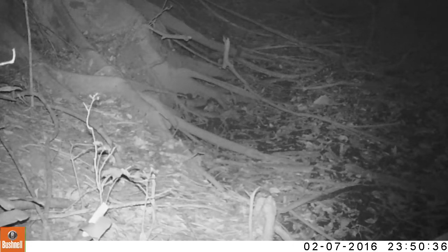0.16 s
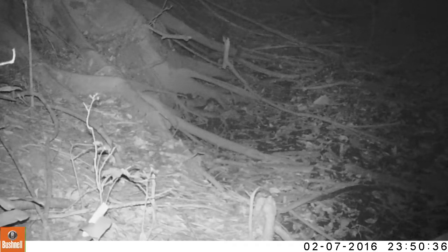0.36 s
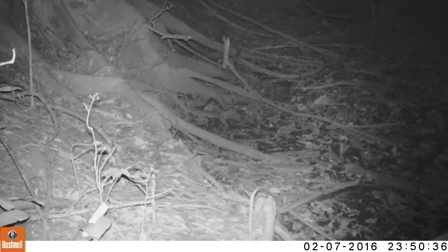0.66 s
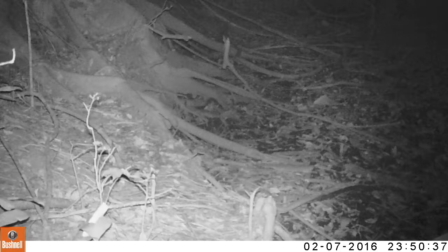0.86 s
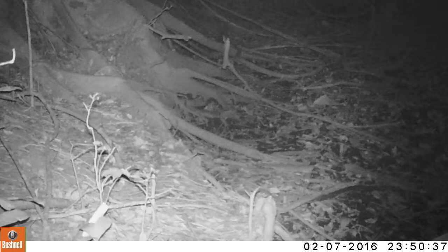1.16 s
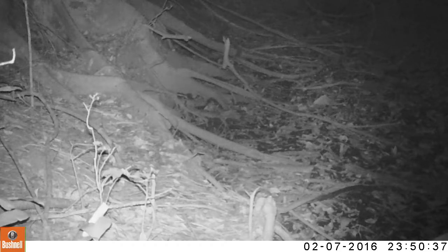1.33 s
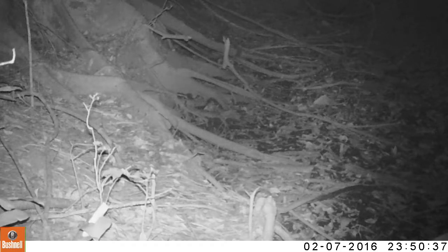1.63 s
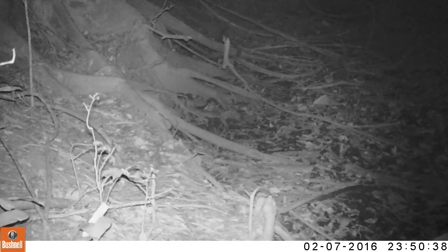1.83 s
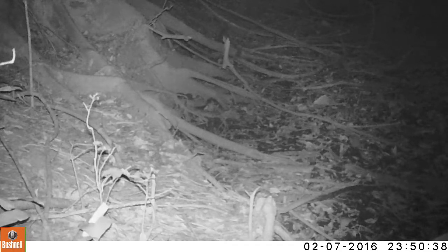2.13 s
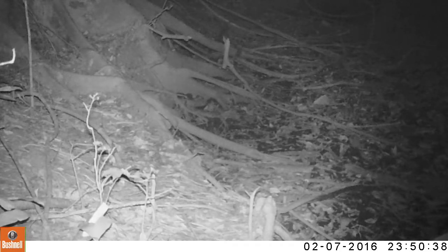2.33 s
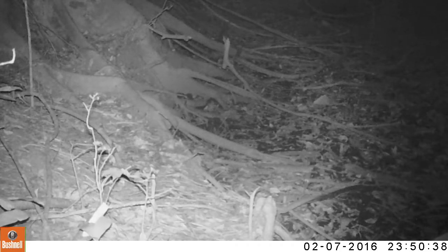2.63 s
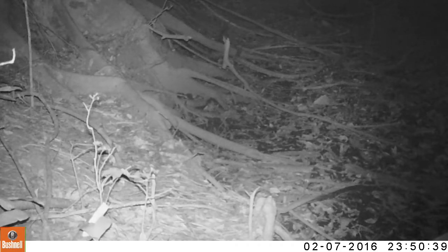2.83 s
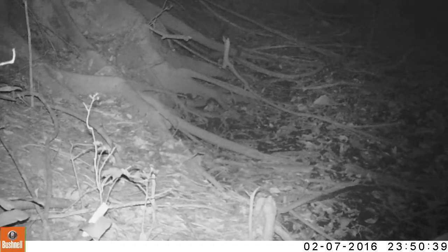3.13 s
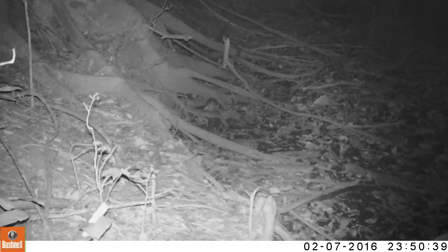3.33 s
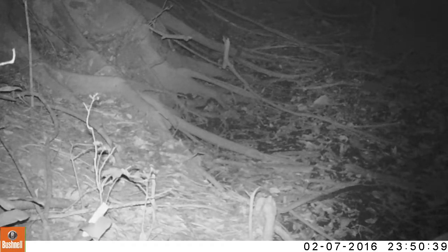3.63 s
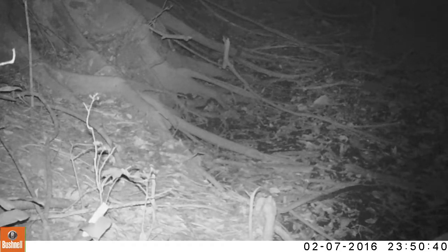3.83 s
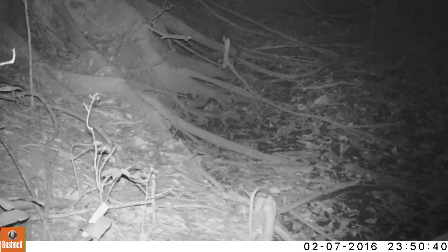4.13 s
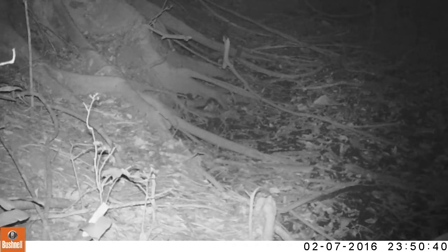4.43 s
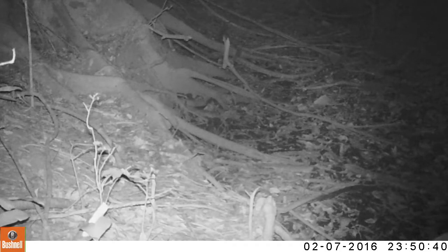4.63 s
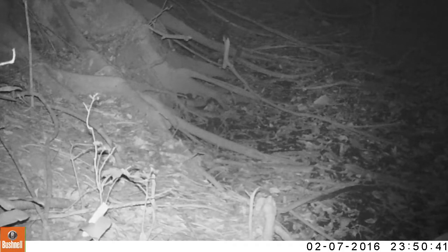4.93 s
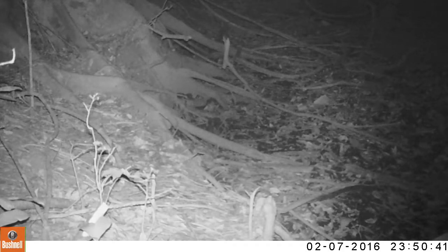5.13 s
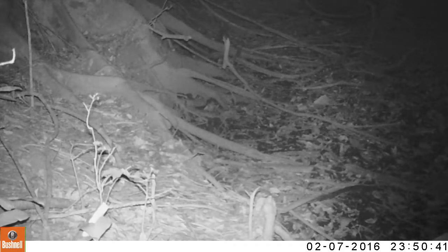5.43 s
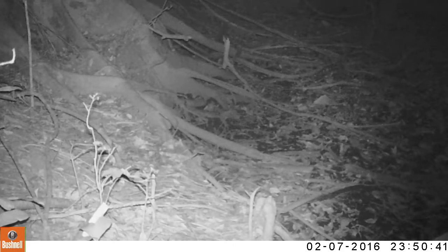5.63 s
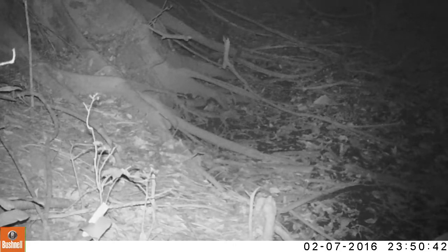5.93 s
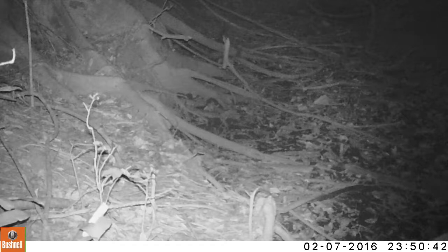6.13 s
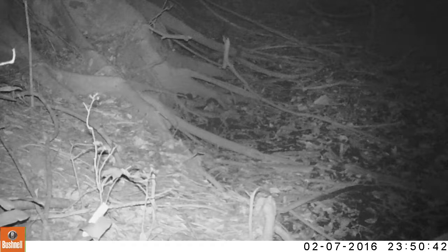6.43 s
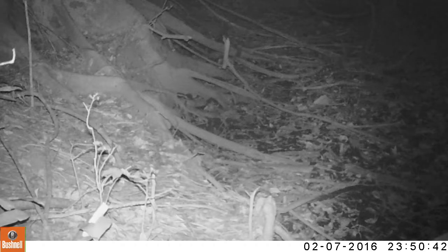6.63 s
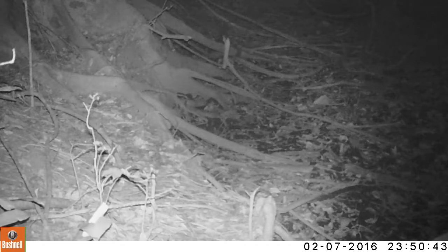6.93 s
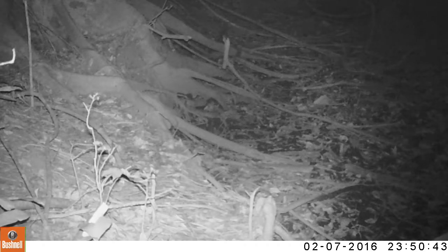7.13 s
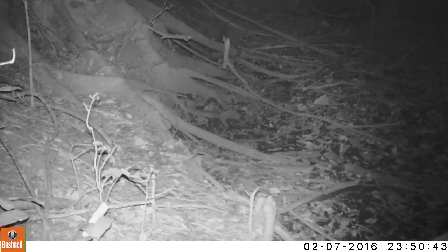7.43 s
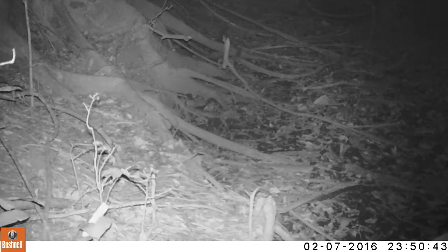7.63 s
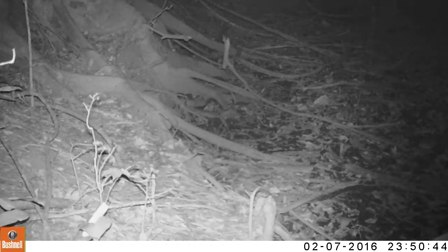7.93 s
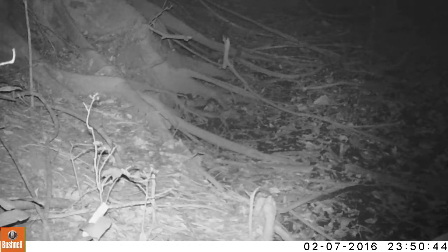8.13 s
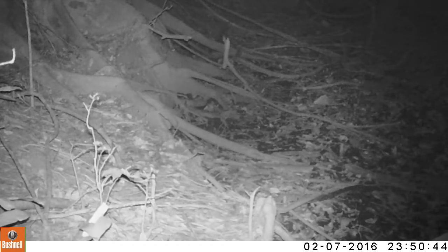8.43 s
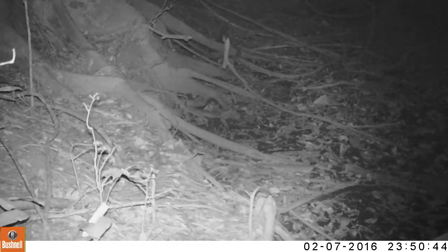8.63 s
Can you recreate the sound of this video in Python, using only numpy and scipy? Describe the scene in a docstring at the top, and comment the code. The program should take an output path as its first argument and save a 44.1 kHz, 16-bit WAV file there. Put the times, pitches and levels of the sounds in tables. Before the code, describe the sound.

Night insects fill a dark forest floor: a low, pulsing tree-cricket trill, chirping crickets and a shrill high buzzing chorus over faint hiss.

```python
"""A forest floor at night, heard by a small microphone among the roots.
A tree cricket trills at 2 kHz, crickets chirp near 5 kHz, and fast buzzers shrill at 4 and 6 kHz.
Each distinct song is a train of gliding wing strokes with echoes; a haze round the trill
and the merged far chorus are shaped noise. Dry litter stirs faintly as bursts of crackling noise,
over a low rumble and hiss, also shaped noise."""
import sys
import numpy as np
from scipy import signal
from scipy.fft import rfft, irfft, next_fast_len
from scipy.io import wavfile

SR = 44100
rng = np.random.default_rng(int(sys.argv[2]) if len(sys.argv) > 2 else 0)


def to_wav(s):
    """Save 16-bit WAV."""
    ch = np.atleast_2d(s).T  # columns
    pcm = np.round(np.clip(ch, -1, 1) * 32767)  # PCM
    wavfile.write(sys.argv[1], SR, pcm.astype(np.int16))


N = 386316
TIME = np.arange(N) / SR  # s

# In stroke and colour tables only level differences count: the sound is scaled afterwards.
# One wing stroke of the tree cricket, a swelling upward glide:
# (share of the cycle [0-1], pitch before flutter [Hz], relative level [dB])
TRILL_STROKE = [(0, 1860, -80), (.14, 1860, -28), (.21, 1895, -6), (.3, 1965, -.7), (.58, 2138, 1),
                (.67, 2135, 0), (.73, 2105, -18), (1, 2100, -80)]
# The band in which its wings ring: (lowest [Hz], highest [Hz])
TRILL_WING_BAND = (1810, 2205)
# Diffuse haze at the trill's pitch: (frequency [Hz], relative level in each Hz [dB])
TRILL_HAZE_COLOUR = [(1700, -40), (1870, -12), (1960, 0), (2130, 0), (2190, -12), (2260, -40)]
TRILL_STROKES_PER_S = 14.815
TRILL_DB, TRILL_HAZE_DB = -59.5, -66.5

# One stroke of a shrill buzzer, falling as the wing slows:
# (share of the cycle [0-1], pitch before detuning [Hz], relative level [dB])
SHRILL_STROKE = [(0, 6330, -11), (.22, 6320, -15), (.33, 6238, 2.5), (.44, 6133, -1.5), (.56, 5996, -5.5),
                 (.68, 5870, 2.5), (.8, 5520, -30), (1, 5550, -38)]
SHRILL_STROKES_PER_S = 53.22
# The nearest shrill buzzer holds its level, then fades away quickly.
NEAR_SHRILL_DB, NEAR_SHRILL_STOP_S, NEAR_SHRILL_FADE_DB_PER_S = -59, 2.5, 112

# Farther shrill buzzers: (pitch ratio [-], stroke rate [1/s], level against the merged chorus [dB])
SHRILL_NEIGHBOURS = [(.975, 59, -10.5), (.95, 42, -12.5), (1.005, 66, -16.5)]
# The merged far chorus: (frequency [Hz], relative level in each Hz [dB])
CHORUS_COLOUR = [(3700, -39), (4100, -30.5), (4480, -12), (4660, -20.5), (4900, -5), (5200, -20.5),
                 (5400, -13.5), (5700, -1.5), (5950, 0.5), (6250, 0), (6450, -8), (6700, -20),
                 (7000, -20.5), (7500, -63)]
# The level at the start, and how fast it climbs.
CHORUS_START_DB, CHORUS_SWELL_DB_PER_S = -61, .38

# One stroke of a low buzzer, falling evenly:
# (share of the cycle [0-1], pitch before detuning [Hz], relative level [dB])
BUZZ_STROKE = [(0, 4395, -22), (.08, 4375, 0), (.38, 4225, 0), (.88, 3895, -5), (1, 3860, -22)]
# The low buzzers: (pitch ratio [-], stroke rate [1/s], level against BUZZ_DB [dB])
LOW_BUZZERS = [(1, 70.08, 0), (.997, 69.15, 0), (1, 56.5, -3)]
# The band in which their wings ring: (lowest [Hz], highest [Hz])
BUZZ_WING_BAND = (3800, 4430)
BUZZ_DB = -70

# One stroke within a chirp: (share of the cycle [0-1], pitch ratio [-], relative level [dB])
CHIRP_STROKE = [(0, 1.005, -12), (.15, 1.004, 0), (.7, .998, 0), (1, .993, -12)]
# Every chirp has the same length and swells and fades alike.
CHIRP_S, CHIRP_RISE_S, CHIRP_FALL_S = 0.474, 0.055, .1
# Far crickets with a steady pace:
# (pitch [Hz], stroke rate [1/s], first chirp [s], time between chirp starts [s], level [dB])
FAR_CRICKETS = [(5050, 24.1, .15, .84, -73.5), (4965, 22.8, .1, .915, -72.5), (4850, 21.3, .4, .98, -75),
                (5229, 26.2, 3.6, 1.1, -80)]
# When the chirps of the two nearer crickets start: (time [s])
HIGH_CHIRP_STARTS = [.22, 1.24, 2.23, 3.08]
LOW_CHIRP_STARTS = [.7, 1.4, 2.33, 3.33, 4.32, 5.2, 5.93, 6.68, 7.78, 8.52]
NEAR_CHIRP_STROKES_PER_S = 22.5
HIGH_CRICKET_HZ, LOW_CRICKET_HZ = 4949, 4878
HIGH_CRICKET_DB, LOW_CRICKET_DB = -62, -68.5

# Dry litter stirring: (start [s], time to fall to 37 % [s], level [dB])
RUSTLES = [(1.05, 0.046, -73), (6.87, 0.056, -68), (6.935, .09, -71), (7.07, 0.34, -77), (8.15, .15, -76)]
# The colour of the litter: (frequency [Hz], relative level in each Hz [dB])
LITTER_COLOUR = [(1500, -42), (3500, 2), (6500, -2), (8000, 3.5), (9500, -9), (11000, -20), (14000, -30)]
RUSTLE_RISE_S = 0.011

# Low rumble and hiss: (frequency [Hz], relative level in each Hz [dB])
FLOOR_COLOUR = [(12, -64), (28, -70), (60, -75), (120, -81), (250, -87.5), (500, -95), (1000, -103.5),
                (1700, -108), (2600, -110.5), (3600, -111.5), (7800, -117), (10000, -118.7),
                (13500, -119.8)]
FLOOR_DB = -52

FOREST_TAIL_S = 0.71  # time for the long echo tail to fall by 60 dB
CUTOFF_HZ = 13900


def from_db(db):
    """Turn decibels into a gain."""
    return 10 ** (np.asarray(db) / 20)


def rms_one(x):
    """Scale a signal to an average power of one."""
    return x / np.sqrt(np.mean(x ** 2) + 1e-20)


def read(rows, at):
    """Read a table's columns at any point, joining its rows by straight lines."""
    first, *columns = np.transpose(rows)
    return [np.interp(at, first, column) for column in columns]


def drift(corner_hz):
    """Smooth random motion of spread 1: noise whose changes faster than the corner are weakened."""
    hz = np.arange(N // 2 + 1) * SR / N
    smoothed = rfft(rng.standard_normal(N)) / (1 + (hz / corner_hz) ** 2)
    return rms_one(irfft(smoothed, N))


def wander(points_per_s):
    """Straight lines between random values of spread 1."""
    return np.interp(TIME * points_per_s, np.arange(1000), rng.standard_normal(1000))


def coloured(x, colour):
    """Strengthen and weaken frequencies as a colour table says, then scale to power one."""
    size = next_fast_len(N, True)
    hz, db = np.transpose(colour)
    bins_hz = np.maximum(np.arange(size // 2 + 1) * SR / size, 1)
    gain = from_db(np.interp(np.log(bins_hz), np.log(hz), db))
    gain = gain * (bins_hz > hz[0])  # nothing below the first row
    return rms_one(irfft(rfft(x, size) * gain, size)[:N])


def strokes(shape, cycles, pitch, uneven_db, detune, scatter):
    """A scraper runs over a file once a cycle and the wing sings a glide, never quite the same twice."""
    which = np.maximum(cycles, 0).astype(int)
    hz, db = read(shape, cycles % 1)
    # Each stroke has its own force, tuning and starting point in the wave.
    force, tuning, start = rng.standard_normal((1200, 3))[which].T
    turns = np.cumsum(hz * pitch * (1 + detune * tuning)) / SR
    turns = turns - np.interp(which, cycles, turns)  # the wing starts afresh at every stroke
    tone = np.sin(2 * np.pi * (turns + scatter * start))
    return rms_one(from_db(db + uneven_db * force) * tone)


def wing(x, band_hz):
    """A wing sends out sound mostly within the band where it rings."""
    band_pass = signal.butter(4, band_hz, "band", fs=SR, output="sos")
    return rms_one(signal.sosfilt(band_pass, x))


def chirps(starts, pitch_hz, strokes_per_s, slip_rad=1.1, uneven_db=2):
    """One cricket: chirps of about ten strokes that swell and fade, uneven in force and tune."""
    swell = 0
    for start_s in starts:
        rise = np.clip((TIME - start_s) / CHIRP_RISE_S, 0, 1)
        fall = np.clip((start_s + CHIRP_S - TIME) / CHIRP_FALL_S, 0, 1)
        swell = swell + rise * fall
    ratio, db = read(CHIRP_STROKE, strokes_per_s * TIME % 1)
    phase = 2 * np.pi * np.cumsum(pitch_hz * ratio) / SR
    phase = phase + slip_rad * wander(2 * strokes_per_s)
    loudness = from_db(db + uneven_db * wander(strokes_per_s))
    return swell * rms_one(loudness * np.sin(phase))


def forest(x, near_db, far_db, near_t60=0.36):
    """Direct sound, a quick scatter from ground and trunks, and a longer tail; the power is kept."""
    t = TIME[:SR // 2]
    early, late = rng.standard_normal((2, len(t))) * (t > .002)  # no echo in the first 2 ms
    early = early * from_db(-60 * t / near_t60)
    late = late * from_db(-60 * t / FOREST_TAIL_S)
    echoes = from_db(near_db) * rms_one(early) + from_db(far_db) * rms_one(late)
    echoes = echoes / np.sqrt(len(t))  # the levels now compare with the direct sound
    return np.std(x) * rms_one(x + signal.fftconvolve(x, echoes)[:N])


def tree_cricket():
    """A steady trill of slow strokes, each gliding up in pitch as the scraper grips unevenly."""
    cycles = .205 + TRILL_STROKES_PER_S * TIME + .012 * wander(5)
    flutter = 1 + .004 * wander(110)
    song = strokes(TRILL_STROKE, cycles, flutter, uneven_db=.3, detune=.003, scatter=.4)
    grip_db = .6 * drift(120)  # the scraper grips the file unevenly
    song = wing(song * from_db(grip_db), TRILL_WING_BAND)
    return from_db(TRILL_DB) * forest(song, near_db=-14, far_db=-10.5, near_t60=.09)


def trill_haze():
    """Diffuse haze at the trill's pitch, filling the gaps between strokes: steady shaped noise."""
    return from_db(TRILL_HAZE_DB) * coloured(rng.standard_normal(N), TRILL_HAZE_COLOUR)


def near_shrill():
    """Fast falling strokes; squaring their wave gives a faint octave above them."""
    past_stop_s = np.maximum(TIME - NEAR_SHRILL_STOP_S, 0)
    level_db = NEAR_SHRILL_DB - NEAR_SHRILL_FADE_DB_PER_S * past_stop_s
    cycles = .385 + SHRILL_STROKES_PER_S * TIME
    song = strokes(SHRILL_STROKE, cycles, 1, uneven_db=1.5, detune=0.0067, scatter=0.52)
    high_pass = signal.butter(4, 9000, "high", fs=SR, output="sos")
    octave = signal.sosfilt(high_pass, song ** 2)
    return from_db(level_db) * forest(song + from_db(-34) * octave, near_db=-6.5, far_db=-7.5)


def shrill_chorus():
    """A few buzzers made of strokes stand before a noise shimmer of farther ones; all slowly swell."""
    level_db = CHORUS_START_DB + CHORUS_SWELL_DB_PER_S * TIME
    out = coloured(rng.standard_normal(N), CHORUS_COLOUR)
    for pitch, strokes_per_s, db in SHRILL_NEIGHBOURS:
        cycles = 1 + strokes_per_s * TIME + .2 * wander(2)
        song = strokes(SHRILL_STROKE, cycles, pitch, uneven_db=1.5, detune=0.0074, scatter=0.32)
        out = out + from_db(db) * forest(song, near_db=-1.0, far_db=-1.0)
    return from_db(level_db) * out


def low_buzzers():
    """Strokes so even that they draw a comb of closely spaced tones round 4 kHz."""
    out = 0
    for pitch, strokes_per_s, db in LOW_BUZZERS:
        cycles = 1 + strokes_per_s * TIME + 0.0391 * wander(2)
        song = strokes(BUZZ_STROKE, cycles, pitch, uneven_db=0.5, detune=0.0019, scatter=0.13)
        song = forest(wing(song, BUZZ_WING_BAND), near_db=2.5, far_db=-8.5)
        out = out + from_db(BUZZ_DB + db) * song
    return out


def night_floor():
    """Random noise, strongest at the bottom, gives the low rumble and hiss."""
    return from_db(FLOOR_DB) * coloured(rng.standard_normal(N), FLOOR_COLOUR)


def far_crickets():
    """Distant crickets each keep an even pace; strong echoes smear their chirps."""
    out = 0
    for pitch_hz, strokes_per_s, first_s, every_s, db in FAR_CRICKETS:
        starts = np.arange(first_s, N / SR, every_s)
        out = out + from_db(db) * chirps(starts, pitch_hz, strokes_per_s)
    return forest(out, near_db=-8, far_db=-1)


def chirping_crickets():
    """Two nearer crickets chirp at their own pitch and loudness; the louder stops after four chirps."""
    high = chirps(HIGH_CHIRP_STARTS, HIGH_CRICKET_HZ, NEAR_CHIRP_STROKES_PER_S, slip_rad=1.1)
    low = chirps(LOW_CHIRP_STARTS, LOW_CRICKET_HZ, NEAR_CHIRP_STROKES_PER_S, slip_rad=0.8)
    both = from_db(HIGH_CRICKET_DB) * high + from_db(LOW_CRICKET_DB) * low
    return forest(both, near_db=-12, far_db=-9, near_t60=.1)


def litter():
    """Brief stirs of dry leaves start quickly and die away, made of clumps of tiny crackles."""
    stir = 0
    for start_s, decay_s, db in RUSTLES:
        rise = np.clip((TIME - start_s) / RUSTLE_RISE_S, 0, 1)
        decay = np.exp(-np.abs(TIME - start_s) / decay_s)
        stir = stir + from_db(db) * rise * decay
    grain_db = 3.5 * np.minimum(rng.exponential(1, N), 6)  # now and then a much louder grain
    clump_db = 2 * drift(80)
    crackles = rng.standard_normal(N) * from_db(grain_db + clump_db)
    return stir * coloured(crackles, LITTER_COLOUR)


def scene():
    """All the singers and the litter over the night's rumble and hiss."""
    trill = tree_cricket() + trill_haze()
    buzzers = near_shrill() + shrill_chorus() + low_buzzers()
    crickets = far_crickets() + chirping_crickets()
    return (trill + buzzers + crickets + night_floor() + litter())[None]


def record(dry):
    """Cut the top steeply: a low-pass filter removes nearly all above the cutoff."""
    low_pass = signal.ellip(12, .1, 70, CUTOFF_HZ, fs=SR, output="sos")
    return signal.sosfilt(low_pass, dry)


dry = scene()
out = record(dry)
to_wav(out)
```